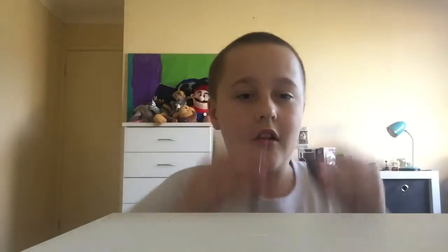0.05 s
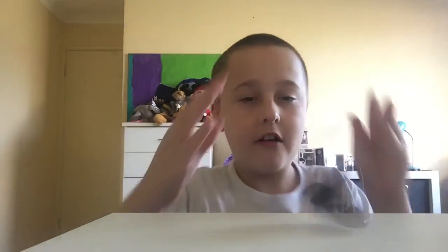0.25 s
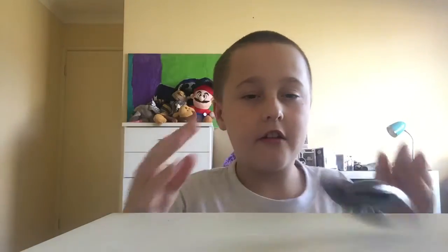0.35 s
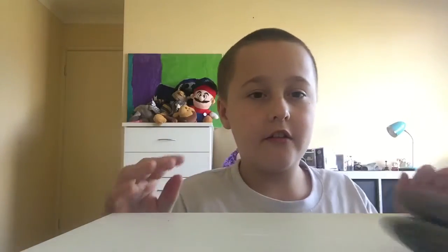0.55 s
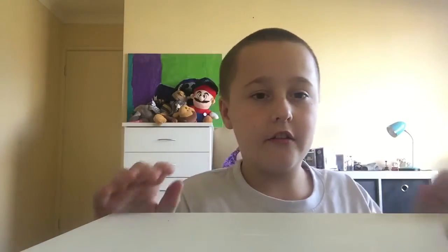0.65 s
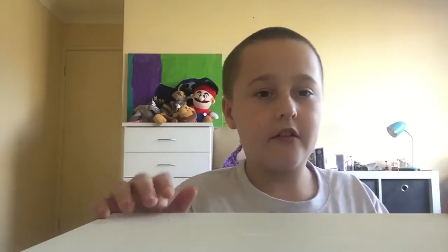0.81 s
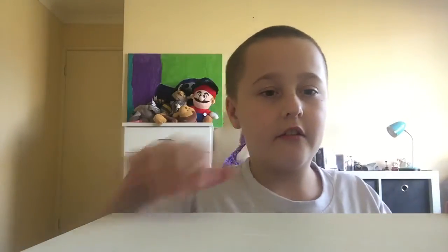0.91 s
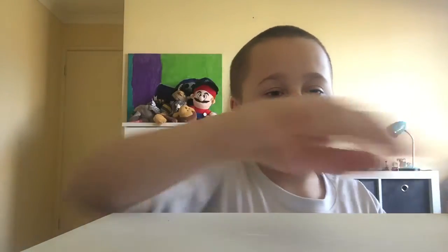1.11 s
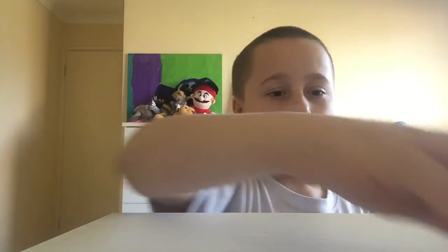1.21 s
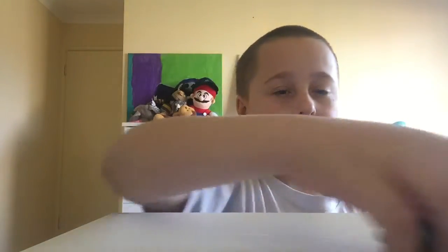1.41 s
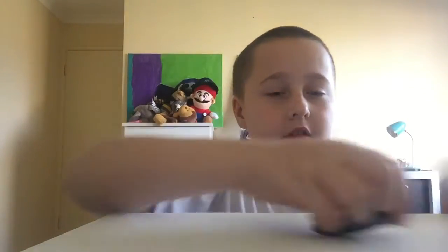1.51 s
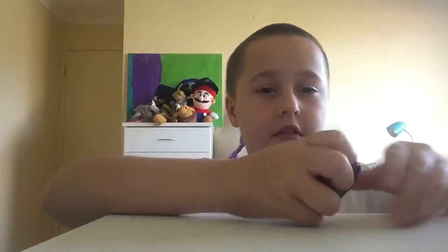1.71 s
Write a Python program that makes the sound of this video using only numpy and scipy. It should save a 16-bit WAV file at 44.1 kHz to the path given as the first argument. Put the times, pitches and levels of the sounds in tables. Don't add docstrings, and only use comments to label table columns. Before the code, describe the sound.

Two tossed magnets clack together, slam onto a hollow table, buzz, settle, and get dragged away

```python
import sys
import numpy as np
from scipy import signal
from scipy.fft import rfft, irfft
from scipy.io import wavfile
from scipy.ndimage import uniform_filter1d

SR = 44100
rng = np.random.default_rng(int(sys.argv[2]) if len(sys.argv) > 2 else 0)


def to_linear_factor(level_db):
    exponent = np.asarray(level_db, float) / 20
    return 10 ** exponent


def generate_wav(sig):
    pcm = np.round(np.clip(np.atleast_2d(sig).T, -1, 1) * 32767).astype(np.int16)
    wavfile.write(sys.argv[1], SR, pcm)


N = 77175
T = np.arange(N) / SR


def unit(x):
    return x / np.sqrt(np.mean(x ** 2) + 1e-30)


def peak(x):
    return x / abs(x).max()


def conv(x, response):
    return signal.fftconvolve(x, response)[:len(x)]


def decay(t, t60):
    return np.exp(-np.log(1000) * t / t60)


def lowpass(x, order, hz):
    return signal.sosfilt(signal.butter(order, hz, fs=SR, output="sos"), x)


def colour(points):
    hz, db = np.array(points, float).T
    bins_hz = np.arange(1025) * SR / 2048
    log_gain = np.interp(np.log(bins_hz + 1), np.log(hz), db) * np.log(10) / 20
    cepstrum = irfft(log_gain)
    cepstrum[1:1024] *= 2
    cepstrum[1025:] = 0
    return irfft(np.exp(rfft(cepstrum)))[:1024]


def spikes(times, sizes):
    x = np.zeros(N + 2)
    at = np.clip(np.asarray(times) * SR, 0, N - 1)
    k = at.astype(int)
    np.add.at(x, k, sizes * (1 + k - at))
    np.add.at(x, k + 1, sizes * (at - k))
    return x[:N]


def echoed(times, sizes, lag_ms, echo_db=-4):
    return spikes(times, sizes) + to_linear_factor(echo_db) * spikes(times + lag_ms / 1000, sizes)


def ring(modes, extra_db=0, cycles=0):
    hz, db, t60 = np.array(modes, float).T[:, :, None]
    t = T[:SR // 4]
    rise = 1 - np.exp(-(hz * t / cycles) ** 2) if cycles else 1
    return to_linear_factor(db[:, 0] + extra_db) @ (rise * decay(t, t60) * np.sin(2 * np.pi * hz * t))


def tail(t60):
    h = rng.standard_normal(SR // 2) * decay(T[:SR // 2], t60)
    return h / np.sqrt(np.sum(h ** 2))


def room():
    # (frequency [Hz], density [dB per Hz])
    hiss_tone = [(30, -20.5), (96, -3.5), (150, -15), (360, -18), (480, -17), (1200, -20), (2600, -28.5),
                 (16000, -39.5)]
    level_db, duck_db = -65, -22
    flicker_db = 0.43 * unit(uniform_filter1d(rng.standard_normal(N), size=1500))
    duck = np.interp(T, [.23, 0.51], [0, duck_db])
    return unit(conv(rng.standard_normal(N), colour(hiss_tone))) * to_linear_factor(level_db + flicker_db + duck)


def clacks():
    # (time [s], peak [dB])
    clack_hits = [(0.2137, -40.5), (0.2357, 6), (0.2442, 8), (0.2513, -14), (0.26, -10), (0.2752, 8),
                  (0.2825, 11.5), (0.2981, 8.5), (0.3036, 12.5), (0.3202, -1.5), (.332, -1.5), (0.3367, 5),
                  (0.346, -15), (0.3523, -5.5), (0.3605, 1), (0.3663, -9), (0.3666, 6), (0.3676, -11),
                  (0.375, -5), (0.3839, -13.5), (0.3877, -9)]
    # (frequency [Hz], density [dB per Hz])
    click_tone = [(300, -39.5), (2200, -10), (2900, -17.5), (3600, -10.5), (4700, -25), (5800, -8),
                  (11700, -9), (16300, -18)]
    # (frequency [Hz], level [dB], t60 [s])
    magnet_modes = [(3500, -8, .004), (6300, 0, .003), (6900, -2, .004), (8900, 0, .003), (11400, -3, .003)]
    screen_ms, screen_db = 1.7, -15
    scatter_db, scatter_t60_s = -19, 0.0057
    ring_db = -7
    at, db = np.array(clack_hits).T
    table_lag_ms = .3 * to_linear_factor(4.6 * rng.standard_normal(len(at)))
    hits = echoed(at, to_linear_factor(db), table_lag_ms)
    hits = hits + to_linear_factor(screen_db) * spikes(at + screen_ms / 1000, to_linear_factor(db))
    scatter_envelope = conv(hits, decay(T[:SR // 4], scatter_t60_s))
    hits = hits + to_linear_factor(scatter_db) * rng.standard_normal(N) * scatter_envelope
    click = conv(hits, peak(colour(click_tone)))
    return click + to_linear_factor(ring_db) * conv(hits, peak(np.diff(ring(magnet_modes))))


def knocks():
    # (time [s], peak [dB], tick [dB], centre of the struck spot [Hz])
    knock_hits = [(.344, -12.5, -38, 540), (.3677, 18, -12, 920), (.3765, 10.5, -49.5, 550),
                  (.388, 12.5, -28, 806), (.397, -0.5, -43.5, 623), (.4885, 5.5, -50, 740),
                  (.5205, -0.5, -46, 900), (.5695, -6.5, -54.5, 1200), (.595, -10.5, -64, 498),
                  (.647, -15.5, -86, 555), (.6718, 6.5, -33.5, 1090), (.689, -1, -52, 557),
                  (.7062, -3.5, -50, 764), (.7155, -5.5, -65, 750), (.7217, -35, -64, 685),
                  (.7535, 1, -48.5, 716), (.768, -23, -56.5, 980), (.796, -19, -63.5, 1018),
                  (.806, -18, -67, 395), (.825, -23.5, -84.5, 300), (1.335, -32, -70.5, 398),
                  (1.364, -31, -93.5, 280), (1.397, -28, -87.5, 313), (1.428, -14, -89.5, 410),
                  (1.471, -32, -77, 387), (1.5845, -15, -56.5, 2200), (1.587, 2.5, -80, 350),
                  (1.598, -18, -72.5, 400), (1.606, -11.5, -64, 330), (1.664, -21, -80.5, 717)]
    # (frequency [Hz], level [dB], t60 [s])
    table_modes = [(216, -3, 0.18), (319, 8.5, 0.027), (391.4, 13.5, 0.026), (453, 8, 0.035),
                   (555.6, 2.5, 0.042), (740.5, 15.5, 0.018), (900, 5, 0.023), (1056, 8.5, .025),
                   (1146.4, 5.5, 0.018), (1447, 8, 0.01), (1712, 3.5, 0.02), (2130, 6.5, .012),
                   (2770, -6, 0.036), (4630, -7.5, 0.0023)]
    # (time [s], level [dB])
    jumps = [
        (0.37, -5),
        (0.389, -38),
        (0.487, -40),
        (0.671, -53.5),
        (1.347, -47),
        (1.589, -52),
    ]
    # (frequency [Hz], level [dB], t60 [s])
    jump_modes = [(62, 7.5, 0.074), (101, 17, 0.022)]
    # (frequency [Hz], density [dB per Hz])
    tick_tone = [(1500, -21.5), (3500, -14), (5000, -9.5), (6500, -8), (8500, 4.5), (12000, -6),
                 (16000, -21)]
    knock_gain_db, tick_gain_db = -2.5, 20
    board_tail_db, board_t60_s = -8.5, 0.11
    board_lag_s = .0004
    spot_db_per_oct2, mode_scatter_db = 5, 2.5
    mode_hz = np.array(table_modes)[:, 0]
    rung = np.zeros(N)
    for s, db, _, spot_hz in knock_hits:
        spot_db = -spot_db_per_oct2 * np.log2(mode_hz / spot_hz) ** 2
        luck_db = mode_scatter_db * rng.standard_normal(len(mode_hz))
        board = ring(table_modes, luck_db + spot_db, cycles=.55)
        board = board + to_linear_factor(board_tail_db) * conv(board, tail(board_t60_s))
        rung += conv(spikes([s + board_lag_s], -to_linear_factor(db + knock_gain_db)), peak(board))
    rung = signal.sosfilt(signal.butter(3, [150, 6500], "band", fs=SR, output="sos"), rung)
    at, _, tick_db, _ = np.array(knock_hits).T
    ticks = conv(spikes(at, to_linear_factor(tick_db + tick_gain_db)), peak(colour(tick_tone)))
    jump_at, jump_db = np.array(jumps).T
    boom = conv(spikes(jump_at, to_linear_factor(jump_db)), ring(jump_modes, cycles=.3))
    return rung + boom + ticks + to_linear_factor(-15) * conv(ticks, tail(0.13))


def buzz():
    slow_taps = [394.7, 398.1, 401.8, 405.5, 409.9, 414.6, 418.9, 422.8, 426.5, 430.4, 434.9, 439.5, 443.7,
                 447.5, 451.1, 454.8, 458.6, 462.2, 466.2, 469.9, 473.4, 476.6, 479.7, 483, 486.5, 489.9,
                 493.4, 496.3, 499.5, 502.2, 505.1, 507.5, 510.1, 512.7, 515.1, 517.5, 519.8, 522.5]
    # (time [s], rate [taps per s])
    tap_rate = [(.5225, 480), (.53, 520), (.541, 520), (.548, 620), (.558, 665), (.568, 780), (.572, 1100),
                (.58, 1330), (.595, 1900)]
    # (time [s], level [dB], ring [dB])
    tap_strength = [(0.396, -19, -8.5), (0.409, -18.5, -5), (.425, -20, -8.5), (.45, -18.5, -2),
                    (0.486, -18.5, -4.5), (.505, -14, -12), (.53, -12, -14.5), (.573, -20.5, -26.5),
                    (0.594, -51, -20)]
    # (time [s], lag [ms])
    echo_lag = [(.4, .325), (.455, .32), (.478, .295), (.487, .26), (.497, .16), (.508, .145), (.522, .11)]
    # (frequency [Hz], density [dB per Hz])
    tap_tone = [(1500, -38.5), (3500, -11.5), (4600, -8.5), (6500, -4.5), (9500, -1), (15000, -8.5),
                (17000, -27)]
    # (frequency [Hz], level [dB], t60 [s])
    pair_modes = [(3730, -6, .005), (6800, 2.5, 0.0024), (9300, 3.5, .005), (12000, -7.5, 0.0041)]
    jitter_periods, scatter_db = .012, 1
    late_ring_ms, late_ring_db = 0.71, 0
    rate_s, rate = np.array(tap_rate).T
    on = (T > rate_s[0]) & (T < rate_s[-1])
    phase = np.cumsum(np.interp(T, rate_s, rate) * on) / SR
    fast_taps = T[np.flatnonzero(np.diff(np.floor(phase)))]
    at = np.append(np.array(slow_taps) / 1000, fast_taps)
    time_luck, size_luck = rng.standard_normal((2, len(at)))
    strength_s, tap_db, ring_db = np.array(tap_strength).T
    size = to_linear_factor(np.interp(at, strength_s, tap_db) + scatter_db * size_luck)
    at = at + jitter_periods * time_luck / np.interp(at, rate_s, rate)
    ring_size = size * to_linear_factor(2.5 + np.interp(at, strength_s, ring_db))
    lag_ms = np.interp(at, *np.array(echo_lag).T)
    taps = conv(echoed(at, size, lag_ms), peak(colour(tap_tone))) * to_linear_factor(3)
    late = to_linear_factor(late_ring_db) * spikes(at + late_ring_ms / 1000, ring_size)
    return taps + conv(spikes(at, ring_size) + late, peak(np.diff(ring(pair_modes))))


def in_air(x):
    dull_at_s, dull_hz = .525, 13500
    gate_s, gate_db_per_s = .575, 459
    air_db, air_t60_s = -13.5, .36
    x = np.where(T < dull_at_s, x, lowpass(x, 8, dull_hz))
    gate = to_linear_factor(-gate_db_per_s * np.clip(T - gate_s, 0, 1))
    return to_linear_factor(-2.5) * (x + to_linear_factor(air_db) * gate * conv(x, tail(air_t60_s)))


def rub(curve, tone, throb_db=0, sing=None):
    grains_per_s, grain_db = 5000, 2
    rock_hz, rock_at_s = 16.2, 1.003
    soft_hz, sing_slope = 900, 1.2
    curve_s, curve_db = np.array(curve).T
    chance, sign, luck = rng.random((3, N))
    grains = (chance < grains_per_s / SR) * np.sign(sign - .5) * to_linear_factor(-grain_db * np.log(luck + 1e-9))
    throb = throb_db * (np.cos(2 * np.pi * rock_hz * (T - rock_at_s)) - .5)
    x = unit(conv(grains, colour(tone)))
    if sing:
        firm = np.clip(to_linear_factor(np.interp(T, curve_s, curve_db) - np.sort(curve_db)[-2]), 0, 1)
        soft = lowpass(x, 2, soft_hz)
        x = soft + firm ** .5 * (x - soft)
        x = x + firm ** sing_slope * conv(unit(grains), ring(sing, cycles=1.8))
    x = x / np.sqrt(uniform_filter1d(x ** 2, size=2000) + 1e-12)
    level = to_linear_factor(np.interp(T, curve_s, curve_db, -120, -120) + throb)
    return x * uniform_filter1d(level, size=200)


def rolling():
    # (time [s], level [dB])
    roll_curve = [(.4, -13), (.44, -26), (.53, -34.5), (.63, -33), (.68, -36.5), (.74, -29.5),
                  (.785, -45.5), (.83, -36), (.845, -59)]
    # (frequency [Hz], density [dB per Hz])
    roll_tone = [(70, -33.5), (200, 3.5), (450, -3.5), (750, -5), (1160, -13.5), (2200, -24.5),
                 (3000, -42.5), (5000, -61)]
    return rub(roll_curve, roll_tone)


def rocking():
    # (time [s], level [dB])
    rock_curve = [
        (.83, -40.5),
        (.95, -45),
        (1.05, -55),
        (1.2, -56.5),
        (1.32, -55.5),
    ]
    # (frequency [Hz], density [dB per Hz])
    rock_tone = [(60, -66.5), (130, -12), (215, -1), (400, -3.5), (560, -23), (750, -23.5), (2100, -34.5),
                 (3000, -60.5)]
    return rub(rock_curve, rock_tone, throb_db=5)


def dragging():
    # (time [s], level [dB])
    drag_curve = [(1.31, -71.5), (1.335, -31), (1.365, -41.5), (1.415, -32), (1.43, -29), (1.5, -22.5),
                  (1.537, -26.5), (1.548, -36), (1.584, -37)]
    # (frequency [Hz], density [dB per Hz])
    drag_tone = [(90, -59), (230, -0.5), (400, 2), (580, -18), (1480, -21.5), (2500, -23.5), (3000, -37),
                 (5500, -56.5)]
    # (frequency [Hz], level [dB], t60 [s])
    drag_modes = [(337.6, -32, 0.035), (741, -21, 0.021), (1104, -26, 0.024), (2084, -32, 0.024)]
    return rub(drag_curve, drag_tone, sing=drag_modes)


def hand():
    # (time [s], level [dB])
    skin_curve = [(1.31, -100.5), (1.39, -69), (1.45, -59), (1.53, -56), (1.574, -73.5), (1.59, -59),
                  (1.702, -65), (1.73, -74)]
    # (frequency [Hz], density [dB per Hz])
    skin_tone = [(2500, -20), (4700, -24.5), (6500, -6.5), (9900, -1.5), (14500, -20.5), (16000, -29)]
    grit_db = 2.5 * unit(uniform_filter1d(rng.standard_normal(N), size=90))
    grit = rng.standard_normal(N) * to_linear_factor(grit_db)
    return unit(conv(grit, colour(skin_tone))) * to_linear_factor(np.interp(T, *np.array(skin_curve).T, -120, -120))


def lifting():
    # (time [s], level [dB])
    lift_curve = [(1.588, -16), (1.62, -26), (1.665, -25.5), (1.69, -29), (1.706, -25), (1.722, -36),
                  (1.75, -47)]
    # (frequency [Hz], density [dB per Hz])
    lift_tone = [(80, -42), (236, -0.5), (420, -9), (700, 0), (1000, -15), (2900, -30.5), (3250, -67.5),
                 (4600, -75.5)]
    # (frequency [Hz], level [dB], t60 [s])
    lift_modes = [(205.8, -19.5, 0.052), (674, -22, 0.066), (900, -28.5, 0.024), (3700, -50, 0.037)]
    return rub(lift_curve, lift_tone, sing=lift_modes)


def scene():
    magnets = in_air(clacks() + buzz())
    rubs = rolling() + rocking() + dragging() + lifting()
    return (room() + magnets + knocks() + rubs + hand())[None]


def band_limit(x):
    return signal.sosfilt(signal.butter(12, 16490, fs=SR, output="sos"), x)


def record(dry):
    clipped = np.clip(dry, -1, 1)
    top_cut = signal.ellip(10, .2, 80, 16400, fs=SR, output="sos")
    return band_limit(signal.sosfilt(top_cut, clipped))


dry = scene()
out = record(dry)
generate_wav(out)
```